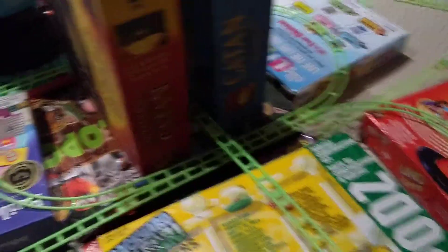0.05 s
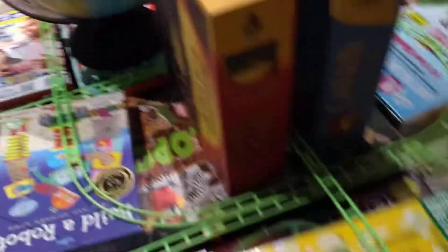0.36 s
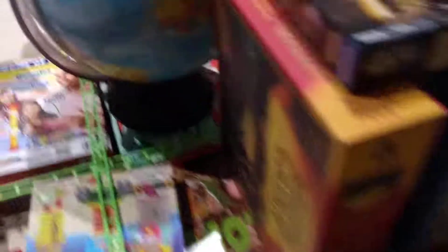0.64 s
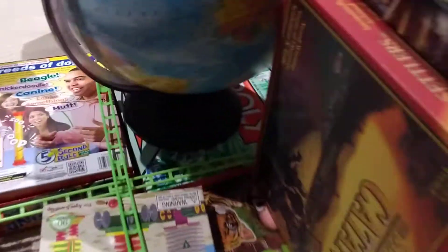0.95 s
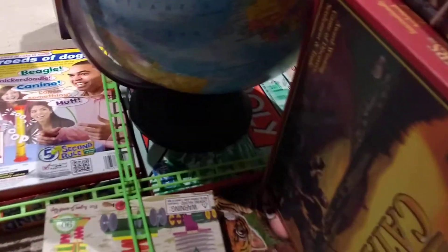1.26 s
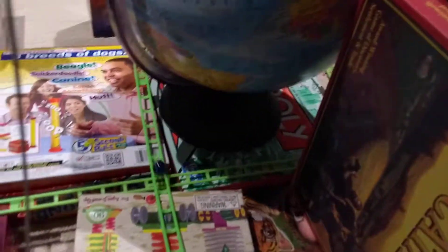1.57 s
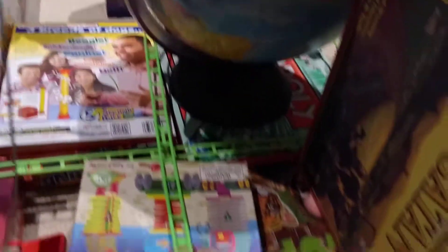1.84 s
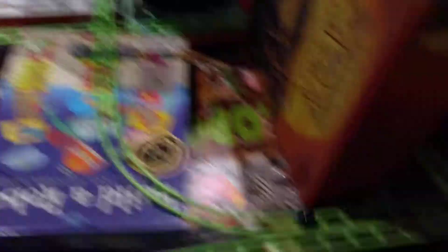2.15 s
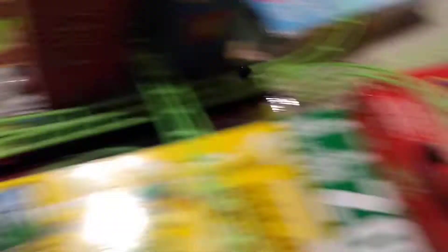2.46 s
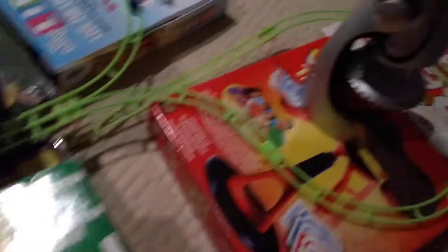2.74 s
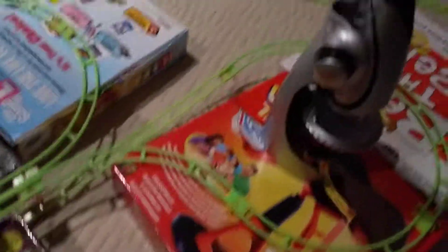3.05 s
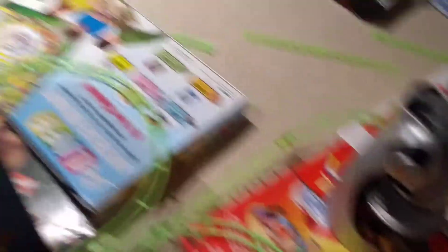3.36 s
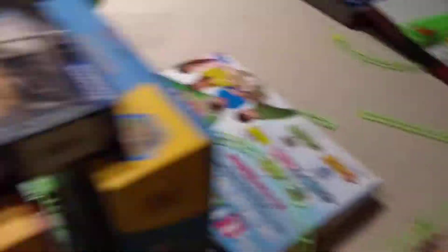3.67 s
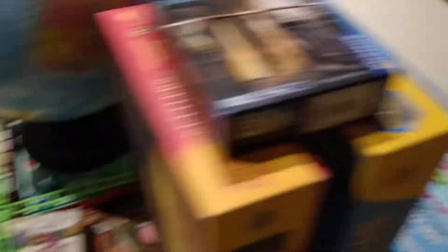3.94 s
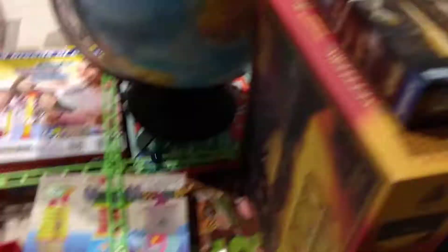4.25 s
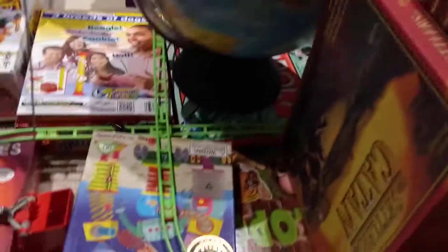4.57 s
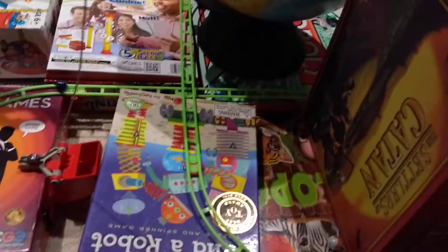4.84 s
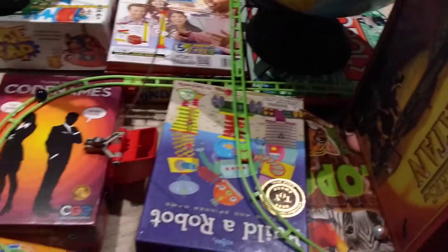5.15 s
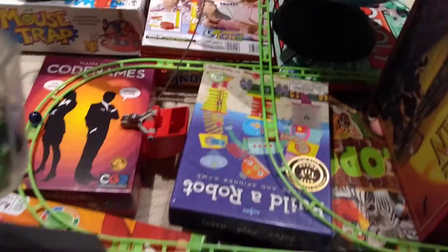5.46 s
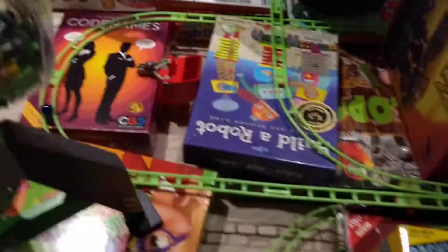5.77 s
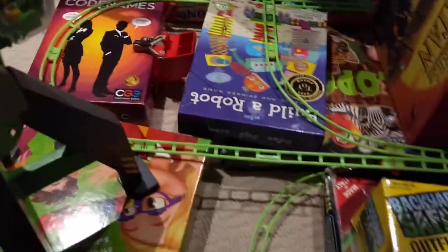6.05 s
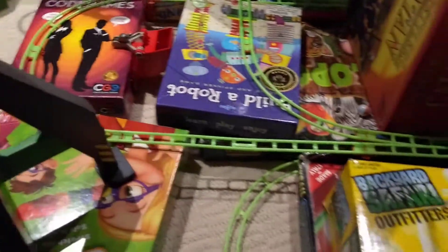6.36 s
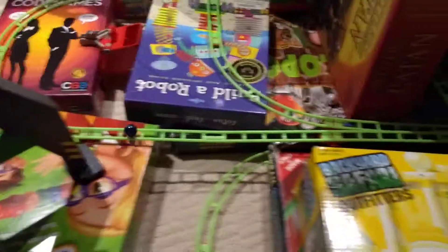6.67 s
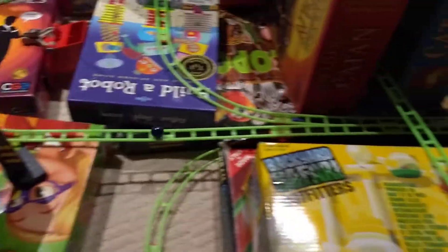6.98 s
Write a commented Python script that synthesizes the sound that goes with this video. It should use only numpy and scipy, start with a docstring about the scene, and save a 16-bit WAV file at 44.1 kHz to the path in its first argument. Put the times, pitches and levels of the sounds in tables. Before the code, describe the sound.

A marble rolling down plastic rails over cardboard boxes, whirring, knocking and ticking in a small room.

```python
"""A marble whirrs down a plastic rail track laid over cardboard game boxes in a small room.
Its rough contact drives rails and boxes into forced vibration; each stretch has its own resonances,
and single ones swell into hollow notes. Impacts at joints, bends and sleepers clack, knock and tick,
and friction briefly makes a rail sing. A hand-held camera follows the marble, hearing it over a faint
hiss and hum with two close microphones that are widened by delayed crossfeed."""
import sys
import numpy as np
from scipy import signal
from scipy.fft import rfft, irfft, next_fast_len
from scipy.io import wavfile
from scipy.ndimage import map_coordinates

SR = 44100
rng = np.random.default_rng(int(sys.argv[2]) if len(sys.argv) > 2 else 0)


def store_wav(level_fs):
    """Save 16-bit WAV to argv[1]."""
    pcm = np.round(np.clip(np.atleast_2d(level_fs), -1, 1) * 32767)
    wavfile.write(sys.argv[1], SR, pcm.T.astype(np.int16))


N = 313551
TIME = np.arange(N) / SR
HZ = np.fft.rfftfreq(8192, 1 / SR)  # frequency axis of the filter curves
RING_DB = 12  # height of the local resonance under a knock or a sleeper tick

# The four bands of the sound: boom, whirr, rasp and hiss. Each row: lower and upper edge in Hz, T60 of
# the rattle and of the room in seconds, room level in dB, level of the tiny rolling impacts in dB.
BANDS = [(89, 398, 0.1, 0.51, -8.5, -12.5), (380, 1460, 0.13, 0.2, -12, -25),
         (1410, 5770, 0.062, 0.32, -10, -7.5), (6490, 13700, 0.088, 0.27, -15, -9.5)]


def amp(db):
    """Amplitude ratio of a level in decibels."""
    return 10 ** (np.asarray(db) / 20)


def unit_rms(x):
    """Normalisation to a mean power of 1."""
    return x / np.sqrt(np.mean(x ** 2) + 1e-20)


def curve(points, hz, column=1):
    """Interpolation of a spectrum table on a logarithmic frequency axis."""
    table = np.array(points, float)
    return np.interp(np.log(hz + 1), np.log(table[:, 0] + 1), table[:, column])


def add(mix, start_s, sound):
    """Superposition of a sound on the mix, in place."""
    part = mix[:, max(round(start_s * SR), 0):][:, :sound.shape[1]]
    part += sound[:, :part.shape[1]]


def peaks(modes):
    """Resonance curve in dB: one Lorentzian peak for each mode."""
    return sum(db / (1 + (2 * (HZ - hz) / width) ** 2) for hz, width, db in modes)


def band(lo_hz, hi_hz, order=14):
    """Response in dB of a steep band-pass."""
    return -10 * np.log10((1 + (lo_hz / (HZ + 1)) ** order) * (1 + (HZ / hi_hz) ** order))


def colour(x, db):
    """Minimum-phase filter with the given dB curve: it rings after a blow, never before."""
    log_gain = np.log(amp(np.maximum(db, db.max() - 100)))
    mirrored = np.r_[log_gain, log_gain[-2:0:-1]]
    response = np.exp(np.conj(signal.hilbert(mirrored)))
    taps = np.fft.ifft(response).real
    return signal.oaconvolve(x, taps[None, :len(HZ) // 2], axes=1)[:, :x.shape[1]]


def wander(rate_hz):
    """Slow random fluctuation: low-passed noise of rms 1."""
    hz = np.fft.rfftfreq(N, 1 / SR)
    return unit_rms(irfft(rfft(rng.standard_normal(N)) / (1 + (hz / rate_hz) ** 4), N))


def rolling(impacts_per_s=260, chatter_s=0.0045, flutter_db=1.0, lurch_db=0.7, blend_s=0.22, grit=0.34):
    """Forced vibration: roughness and tiny impacts shake the stretch of track under the marble."""
    # Course of the roll. Each row: time in seconds, whirr level in dB, rasp over whirr in dB.
    course = [(0, -42.5, -7), (.42, -45.5, -3), (.72, -51, -9), (.85, -57.5, -10), (1.05, -49.5, -9),
              (1.28, -45, -10), (1.85, -47.5, -1.5), (2.45, -50.5, -2.5), (2.75, -53, 2.5),
              (3.2, -56.5, 1.5), (3.62, -55, -1), (3.69, -61, -2.5), (3.8, -55, -5.5), (4.1, -52, -3.5),
              (4.88, -56, -5.5), (4.98, -50.5, -3), (5.56, -53, -8.5), (5.68, -56, -8.5), (6.2, -59, -7.5),
              (6.7, -55, -9), (7.1, -53.5, -9.5)]
    # Spectral envelope of rolling. Each row: frequency in Hz, relative level in dB.
    spectrum = [(60, 0.5), (110, -11), (160, -11), (260, -6), (570, -4.5), (720, -2), (1000, -4),
                (1350, -7.5), (1900, -4), (2600, -10), (5000, -16.5), (9000, -28.5), (12200, -27),
                (14300, -25)]
    # Modes of the rails throughout, then of each stretch. Each row: centre and width in Hz, height in dB.
    rail_modes = [(659, 14, 2.5), (2667, 32, 4), (3010, 45, 4), (3150, 40, 2), (3330, 40, 2), (4102, 45, 3),
                  (4393, 60, 4)]
    first_ramp = [(136, 66, 13), (255, 98, 5), (526, 230, 10.5), (690, 180, 7.5), (855, 140, 6),
                  (988, 41, 10.5), (1228, 140, 8), (1500, 73, 4), (1670, 970, 3), (2430, 340, 5),
                  (3900, 370, 3), (5440, 340, 1)]
    crossing = [(125, 40, 9), (176, 48, 13), (243, 25, 5), (400, 80, 3), (544, 150, 9), (660, 100, 7),
                (970, 25, 8), (1230, 170, 5.5), (1385, 44, 6), (1700, 280, 4), (3850, 600, 4.5)]
    far_loop = [(145, 50, 8), (490, 60, 4.5), (665, 70, 5), (1050, 100, 6), (1290, 180, 7),
                (1770, 160, 1.5), (2020, 200, 3), (2420, 280, 11), (3150, 450, 4.5)]
    back_straight = [(145, 70, 5), (265, 60, 5), (365, 52, 3.5), (450, 70, 4), (745, 190, 7), (1035, 50, 6),
                     (1280, 240, 5), (1790, 220, 3), (2370, 230, 5), (3600, 700, 2)]
    wide_bend = [(210, 50, 4), (305, 50, 4), (380, 30, 5), (430, 40, 13), (590, 120, 5), (778, 36, 11),
                 (885, 55, 5), (1240, 110, 5), (1410, 110, 5), (1850, 140, 3), (2360, 220, 11),
                 (3400, 400, 4), (4550, 400, 4), (5300, 400, 4)]
    last_straight = [(147, 84, 3.9), (211.6, 23, 6.9), (318, 52, 11.5), (471, 164, 12), (813, 240, 8.7),
                     (992, 31, 10), (1260, 110, 3.8), (1970, 84, 5.2), (2390, 88, 0.68), (3350, 220, 2.9)]
    # Each row: modes, boom of the boxes over the whirr in dB, hiss of the contact over the rasp in dB.
    stretches = [(first_ramp, -8, -7), (crossing, -7.5, -6), (far_loop, -4.5, -11.5),
                 (back_straight, -7.5, -8.5), (wide_bend, -7.5, -11), (last_straight, -4.5, -7)]
    # Times in seconds at which the marble reaches the next stretch.
    joints = [.8, 2.55, 3.72, 4.84, 5.68]
    times, *controls = np.transpose(course)
    whirr, bright = (np.interp(TIME, times, control) for control in controls)
    drum, scrape = swells()
    rasp = whirr + bright + scrape
    lurch = lurch_db * wander(rate_hz=11)  # the track rests unevenly on the boxes
    boom = whirr + 1.1 * drum + lurch  # the boxes answer drumming more than the rails do
    levels = [boom, whirr + drum, rasp, rasp]
    strikes = rng.random(N) < impacts_per_s / SR
    impulses = unit_rms(strikes * np.minimum(rng.exponential(1, N), 3))
    chatter = np.exp(-np.arange(SR // 100) / SR / chatter_s) * rng.standard_normal((2, SR // 100))
    impacts = unit_rms(signal.oaconvolve(impulses[None], chatter, axes=1)[:, :N])
    pressure = unit_rms(amp(flutter_db * wander(rate_hz=32)))  # the marble rocks between the rails
    passed = [np.ones(N)] + [np.clip((TIME - at) / blend_s + .5, 0, 1) for at in joints] + [np.zeros(N)]
    out = np.zeros((2, N))
    for layer, (lo, hi, _, _, _, impact_db) in enumerate(BANDS):
        force = (rng.standard_normal((2, N)) + amp(impact_db + grit * scrape) * impacts) * pressure
        for k, (modes, boom_db, hiss_db) in enumerate(stretches):
            share = passed[k] - passed[k + 1]
            on = share > 0
            track = colour(force[:, on], curve(spectrum, HZ) + peaks(modes + rail_modes) + band(lo, hi))
            level_db = levels[layer][on] + (boom_db, 0, 0, hiss_db)[layer]
            out[:, on] += unit_rms(track) * np.sqrt(share[on]) * amp(level_db)
    return out


def swells(sway_from_s=5.02, sway_to_s=5.53, sway_period_s=0.159, sway_db=2.2):
    """Amplitude modulation in dB from rough patches and from swinging rail to rail in the wide bend."""
    # Each row: middle and half length in seconds, extra drumming and extra scraping in dB.
    rough_patches = [(0.278, 0.059, 5.5, 9), (0.68, 0.031, 3, 1), (2.164, 0.047, 5, 2),
                     (2.559, 0.015, 4, 1), (2.896, 0.033, 7, -1), (3.381, 0.029, 4, 0.5),
                     (4.055, 0.049, 2.5, 2), (5.533, 0.057, 5, 2.5), (6.265, 0.027, 5, 1),
                     (6.495, 0.11, 7, 1.5)]
    drum, scrape = np.zeros((2, N))
    for middle_s, half_s, drum_db, scrape_db in rough_patches:
        arch = np.exp(-((TIME - middle_s) / half_s) ** 2)
        drum += drum_db * arch
        scrape += scrape_db * arch
    in_bend = np.clip(1 + np.minimum(TIME - sway_from_s, sway_to_s - TIME) / sway_period_s, 0, 1)
    sway = np.cos(2 * np.pi * (TIME - sway_from_s) / sway_period_s)
    return drum + sway_db * in_bend * sway, scrape


def standing_waves(x, patch_hz=34, patch_s=.085):
    """Resonances come and go as the marble passes nodes and antinodes, modelled as random gain patches."""
    # Depth of the fluctuation. Each row: frequency in Hz, rms depth in dB.
    depths = [(150, 2), (600, 2.7), (1500, 2.9), (4000, 2.4), (9000, 1.3)]
    hz, t, spectra = signal.stft(x, SR, nperseg=2048, noverlap=1536)
    row = np.log1p(hz / 4000) * 4000 / patch_hz  # patches widen towards the treble
    grid = rng.standard_normal((int(row[-1]) + 2, int(t[-1] / patch_s) + 2))
    patches = unit_rms(map_coordinates(grid, np.meshgrid(row, t / patch_s, indexing="ij"), order=1))
    gain = amp(curve(depths, hz)[:, None] * patches)
    gain /= np.sqrt(np.mean(gain ** 2, axis=1, keepdims=True))
    return signal.istft(spectra * gain, SR, nperseg=2048, noverlap=1536)[1][:, :N]


def noise_floor(level_db=-60):
    """Stationary noise of room and microphones, with a faint hum of pure tones."""
    # Each row: frequency in Hz, relative spectral density in dB.
    spectrum = [(20, -26), (40, 3.5), (62, 7), (110, 3.5), (200, -20.5), (500, 1.5), (1000, -1),
                (2000, -18), (3000, -27), (6000, -16.5), (9500, -19.5), (12500, -15.5), (14300, -17.5)]
    # Hum in the room. Each row: frequency in Hz, level in dB.
    tones = [(59.2, -74), (102.3, -76.5)]
    hum = sum(amp(db) * unit_rms(np.sin(2 * np.pi * (hz * TIME + rng.random((2, 1))))) for hz, db in tones)
    return hum + amp(level_db) * unit_rms(colour(rng.standard_normal((2, N)), curve(spectrum, HZ)))


def hollow_notes(waver=.012, waver_hz=25):
    """Driven resonance: a mode of track or box swells and dies, its pitch wavering as the marble moves."""
    # Each row: middle and half length in seconds, level in dB, frequency in Hz.
    notes = [(.015, .025, -50, 1227), (.06, .06, -51, 883), (.26, .025, -47, 861), (.338, .022, -46, 840),
             (.432, .028, -52, 991), (.66, .035, -50, 668), (.74, .028, -53, 958), (1.325, .035, -49, 538),
             (1.57, .025, -50, 991), (1.68, .045, -49, 581), (1.936, .03, -47.5, 603),
             (2.148, .025, -54, 1012), (2.03, .028, -53, 797), (2.212, .045, -45.5, 657),
             (2.378, .02, -51, 484), (3.728, .012, -46, 275), (3.758, .022, -50, 660),
             (4.09, .028, -54, 1044), (4.16, .03, -55, 678), (4.288, .03, -54, 732), (4.785, .02, -55, 815),
             (5.025, .024, -48, 772), (5.17, .022, -52, 312), (5.174, .026, -45.5, 775),
             (5.23, .03, -50.5, 425), (5.335, .022, -53, 860), (5.445, .038, -49, 420),
             (5.538, .028, -46.5, 431), (5.578, .018, -49.5, 905)]
    drift = waver * wander(waver_hz)
    out = np.zeros((2, N))
    for middle_s, half_s, db, hz in notes:
        near = abs(TIME - middle_s) < 3 * half_s
        cycles = np.cumsum(hz * (1 + drift[near])) / SR + rng.random()
        envelope = np.exp(-((TIME[near] - middle_s) / half_s) ** 2)
        out[:, near] += amp(db) * envelope * unit_rms(np.sin(2 * np.pi * cycles))
    return out


def clacks(thud_db=-39, tick_db=-2.5):
    """Hard, brief contact gives a bright spectrum: chatter on the first ramp, then a rebounding strike."""
    # Each row: start in seconds, level and brightness in dB, ring in Hz, ring height and rattle in dB.
    strikes = [(.214, -61, 12, 2800, 14, -14), (.272, -55, 2, 3300, 5, -12),
               (.292, -51.5, 5, 2870, 19, -14), (0.8764, -41, -10, 798, 21, -32.5),
               (.8845, -63, 7, 810, 9, -30), (0.8996, -49, 13.5, 3070, 9, -26),
               (0.9024, -51, 11, 1800, 12, -30), (0.9029, -56, 11, 3630, 7, -34),
               (0.9069, -47, -12, 1130, 18, -38)]
    return [(s, db + np.array([thud_db, 0, bright, bright / 2 + tick_db]), hz, ring_db, rattle_db, 0)
            for s, db, bright, hz, ring_db, rattle_db in strikes]


def bumps(band_db=(-17.5, -4, -28, -29), ring_db=22, rattle_db=-31):
    """Soft contact gives little treble: mostly one local resonance of the track rings."""
    # Each row: start in seconds, level in dB, ring frequency in Hz.
    strikes = [(.224, -46, 610), (.41, -43, 800), (1.213, -48, 630), (1.261, -52, 650), (1.434, -46, 990),
               (1.445, -47.5, 655), (1.514, -48, 655), (1.787, -45, 575), (1.852, -62, 580),
               (2.094, -56, 593), (2.407, -45.5, 650), (2.461, -49.5, 484), (2.586, -46, 645),
               (4.583, -48, 690), (5.522, -44, 820), (7.032, -48.5, 860)]
    return [(s, db + np.array(band_db), hz, ring_db, rattle_db, 0) for s, db, hz in strikes]


def knocks(rasp_db=-10):
    """Impact excitation at joints and bends: the box thuds, the rail knocks and the contact ticks."""
    # Each row: start in seconds, thud, knock and tick in dB, ring in Hz, rattle in dB, bass lag in seconds.
    strikes = [(.435, -77, -48, -51.5, 860, -9, 0), (0.589, -43, -54, -60, 400, -20, 0),
               (1.327, -45, -42.5, -50, 590, -16, 0.0067), (1.57, -48.5, -42, -64, 980, -24, 0.0083),
               (1.8001, -45, -42, -46.5, 524, -30, 0.021), (1.811, -61, -62, -45, 440, -32, 0),
               (1.824, -51.5, -47, -67, 430, -27, .004), (2.011, -50.5, -43.5, -70, 564, -19, 0.0016),
               (2.1663, -58, -49, -52, 674, -25, 0.0021), (2.371, -65, -48, -61, 480, -17, 0),
               (2.539, -70, -47, -55, 660, -12, 0.0044), (3.7174, -42, -41, -60.5, 635, -32.5, 0.0022),
               (3.741, -54, -57, -73, 685, -22, 0), (4.0684, -50.5, -50, -57.5, 414, -15, 0.0067),
               (4.446, -70, -49, -64, 720, -17, 0.0074), (4.837, -53, -52, -58, 430, -24, 0.0049),
               (5.703, -68, -61, -75, 840, -26, 0.0012), (6.49, -56.5, -50.5, -71, 770, -32, .003)]
    return [(s, (thud, knock, tick + rasp_db, tick), hz, RING_DB, rattle_db, lag_s)
            for s, thud, knock, tick, hz, rattle_db, lag_s in strikes]


def blows(relative_width=0.3):
    """Impulse response: each blow, with a short rattle of the rails, rings in track, boxes and room."""
    # Spectral envelope of a blow. Each row: frequency in Hz, relative level in dB.
    spectrum = [(80, -19), (150, -11), (200, -12), (275, 1), (400, -6), (680, 0), (1050, -5), (1400, -12),
                (1750, -10), (2300, -3), (2900, -4), (3800, -5.5), (4800, -6), (6500, -11), (9000, -15),
                (12300, -9), (14300, -13)]
    # Modes of the struck track and boxes. Each row: centre and width in Hz, height in dB.
    modes = [(280, 70, 8), (441, 60, 4), (660, 40, 5), (740, 60, 4), (1150, 110, 5), (2330, 250, 5),
             (3004, 200, 3), (3600, 400, 3), (4393, 200, 4), (5200, 300, 5), (13000, 1400, 3.5)]
    rattle_tilt_db = (6, 3, 6, 6.5)  # how freely each band rattles
    t = np.arange(SR // 8) / SR
    onset = SR // 50  # the first 20 ms set a blow's level
    events = clacks() + knocks() + bumps() + sleepers()
    out = np.zeros((2, N))
    for k, (lo, hi, rattle_t60, room_t60, room_db, _) in enumerate(BANDS):
        body_db = curve(spectrum, HZ) + peaks(modes) + band(lo, hi)
        rattle = amp(rattle_tilt_db[k] - 60 * t / rattle_t60)
        direct = np.zeros((2, N))
        for start_s, band_db, ring_hz, ring_db, rattle_db, lag_s in events:
            force = (t == 0) + amp(rattle_db) * rattle * rng.standard_normal((2, len(t)))
            ring = colour(force, body_db + peaks([(ring_hz, relative_width * ring_hz, ring_db)]))
            ring = amp(band_db[k]) * ring / ring[:, :onset].std(axis=1, keepdims=True)
            add(direct, start_s, dispersed(ring, lag_s) if lag_s else ring)
        out += direct + amp(room_db) * room(direct, room_t60)
    return out


def room(x, t60, build_s=.004):
    """Reverberation: a diffuse tail of unit energy builds up quickly and decays exponentially."""
    t = np.arange(SR // 2) / SR
    tail = rng.standard_normal((2, len(t))) * amp(-60 * t / t60) * (1 - np.exp(-t / build_s))
    return signal.oaconvolve(x, tail / np.linalg.norm(tail[0]), axes=1)[:, :N]


def handling(lo_hz=32, hi_hz=110):
    """Structure-borne sound: a shifting hand sends low rubbing through the camera's case."""
    # Each row: start and length in seconds, level in dB.
    shifts = [(0.56, 0.16, -58), (4.224, .25, -64), (5.6, 0.47, -70)]
    grip = sum(amp(db) * np.sin(np.pi * np.clip((TIME - s) / length, 0, 1)) for s, length, db in shifts)
    return grip * unit_rms(colour(rng.standard_normal((2, N)), band(lo_hz, hi_hz)))


def dispersed(x, lag_s, corner_hz=400):
    """Dispersion: low bending waves travel slowly and arrive late, so a thud falls in pitch."""
    size = next_fast_len(x.shape[1] + SR // 20)
    hz = np.fft.rfftfreq(size, 1 / SR)
    group_delay = lag_s / (1 + (hz / corner_hz) ** 3)
    return irfft(rfft(x, size) * np.exp(-2j * np.pi * np.cumsum(group_delay) * hz[1]), size)


def squeaks():
    """Friction against the side of the rail in the far loop feeds one narrow resonance."""
    # Each row: middle and half length in seconds, level in dB, centre and width in Hz.
    rubs = [(2.625, 0.12, -58, 3120, 500), (2.816, 0.075, -59.5, 3270, 400), (3.613, 0.02, -58, 2960, 260)]
    t = np.arange(-SR // 4, SR // 4) / SR
    out = np.zeros((2, N))
    for middle_s, half_s, db, hz, width_hz in rubs:
        resonance_db = -10 * np.log10(1 + (2 * (HZ - hz) / width_hz) ** 4)
        song = colour(rng.standard_normal((2, len(t))), resonance_db)
        add(out, middle_s + t[0], amp(db) * np.exp(-(t / half_s) ** 2) * unit_rms(song))
    return out


def sleepers(band_db=(6, 8.5, 0.5, -1.5), ring_hz=5540, rattle_db=-27):
    """One light impact per sleeper: the rate follows speed, falling in the wide bend and rising at last."""
    # Each row: start in seconds, level in dB.
    ticks = [(4.795, -76), (4.886, -63.5), (4.978, -60), (5.07, -65), (5.163, -64.5), (5.256, -61),
             (5.357, -63.5), (5.463, -67), (5.58, -69), (5.703, -82), (5.84, -74), (5.98, -75),
             (6.124, -78), (6.27, -78), (6.412, -73.5), (6.545, -70), (6.6787, -69), (6.806, -72),
             (6.9227, -74), (7.034, -71.5)]
    return [(s, db + np.array(band_db), ring_hz, RING_DB, rattle_db, 0) for s, db in ticks]


def coherence(hz):
    """Spatial coherence: two close microphones hear long waves more alike than short ones."""
    # Each row: frequency in Hz, correlation between the microphones.
    correlations = [(25, 0.42), (85, 0.81), (180, 0.93), (350, 0.85), (700, 0.84), (1150, -0.029),
                    (1650, -0.39), (2150, -0.48), (2600, 0.54), (3400, -0.2), (5000, 0.11)]
    return np.clip(curve(correlations, hz), -.5, .98)


def scene():
    """Superposition of all sources at two partly coherent microphones."""
    sources = standing_waves(rolling()) + blows() + hollow_notes() + squeaks() + handling() + noise_floor()
    common, apart = rfft(sources)
    alike = coherence(np.fft.rfftfreq(N, 1 / SR))
    mid = common * np.sqrt((1 + alike) / 2)
    side = 1j * apart * np.sqrt((1 - alike) / 2)  # spacing shifts the phase
    return irfft(np.array([mid + side, mid - side]), N)


def record(dry, delay_s=18.8 / SR, cutoff_hz=14300):
    """Interference with a delayed share of the other channel widens the image; then pan and low-pass."""
    # Each row: frequency in Hz, share of right subtracted from left, share of left subtracted from right.
    crossfeed = [(50, .85, .85), (300, .8, .9), (1200, .87, .87), (2350, .95, .95), (4700, .92, .92),
                 (7000, .62, .58), (9000, .55, .3), (12000, .7, .1), (14300, .5, .1)]
    # Channel balance. Each row: frequency in Hz, left minus right in dB.
    balance = [(60, -4), (200, -2.5), (380, 0.5), (690, -2), (1280, -5), (2400, -3), (4600, -5.5),
               (8000, -5), (12000, -9.5), (14300, -7)]
    # Slow drift of left-right level over time. Each row: time in seconds, left minus right in dB.
    pan_drift = [(0, 3.5), (.6, 2.5), (1.2, 3.1), (2.7, 5), (3.8, 3.5), (5.2, 4), (6.2, 4), (7.1, 3.5)]
    hz, spectra = np.fft.rfftfreq(N, 1 / SR), rfft(dry)
    share = np.clip([curve(crossfeed, hz, column=1), curve(crossfeed, hz, column=2)], 0, .97)
    late = np.exp(-2j * np.pi * hz * delay_s)
    power_gain = 1 + share ** 2 - 2 * share * coherence(hz) * late.real
    wide = (spectra - share * late * spectra[::-1]) / np.sqrt(power_gain)  # equalised flat again
    wide *= amp(np.outer([.5, -.5], curve(balance, hz)))
    pan_db = np.interp(TIME, *np.transpose(pan_drift))
    panned = irfft(wide, N) * amp(np.outer([.5, -.5], pan_db))
    low_pass = signal.firwin(511, cutoff_hz, window=("kaiser", 7), fs=SR)
    return signal.oaconvolve(panned, low_pass[None], "same", axes=1)


dry = scene()
out = record(dry)
store_wav(out)
```